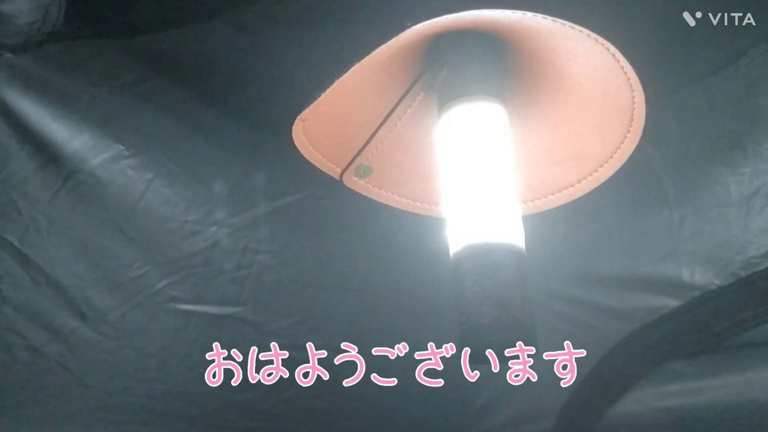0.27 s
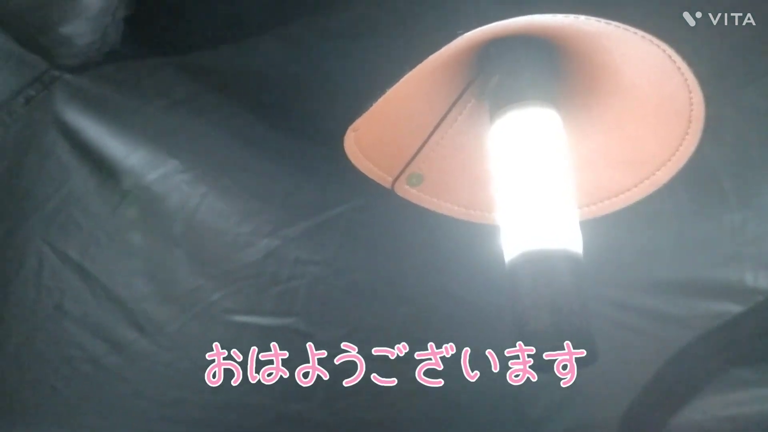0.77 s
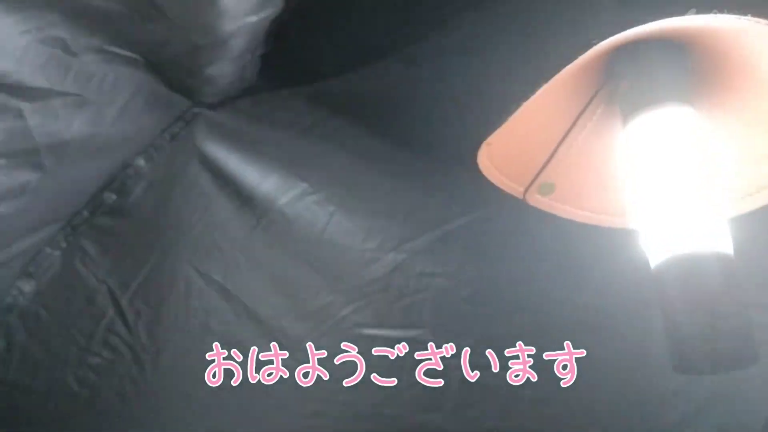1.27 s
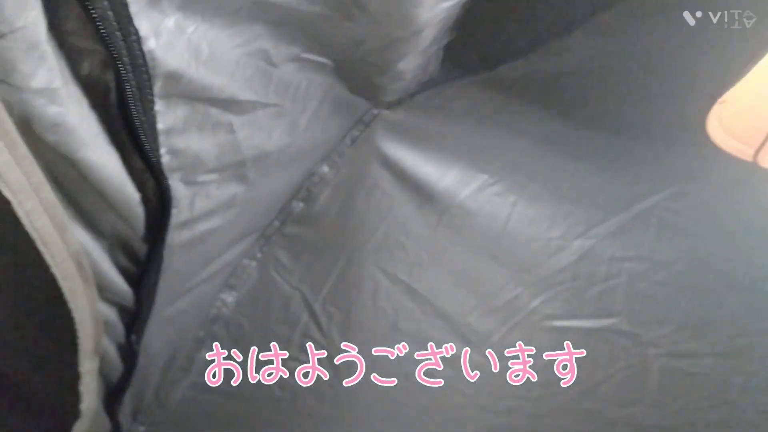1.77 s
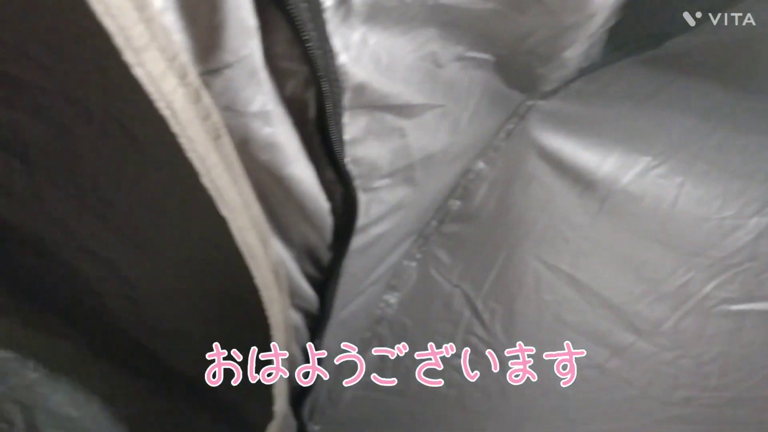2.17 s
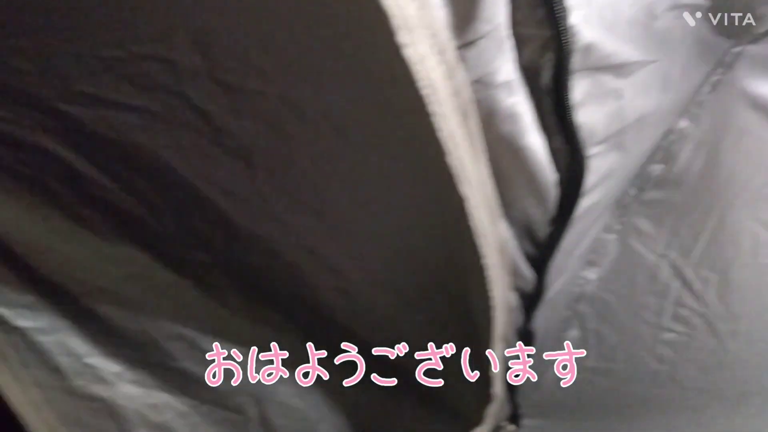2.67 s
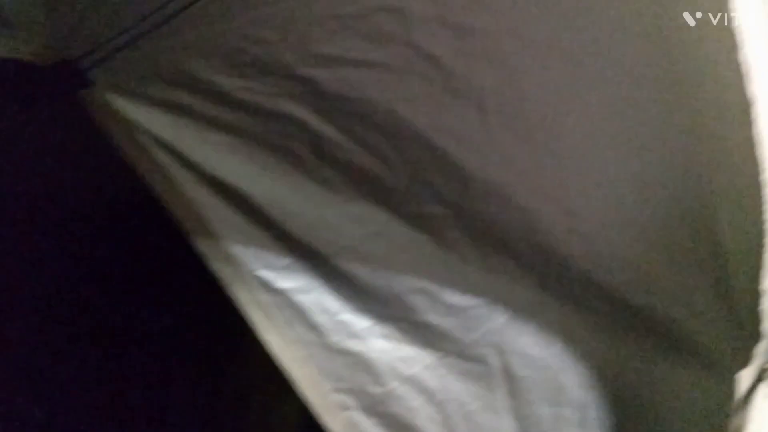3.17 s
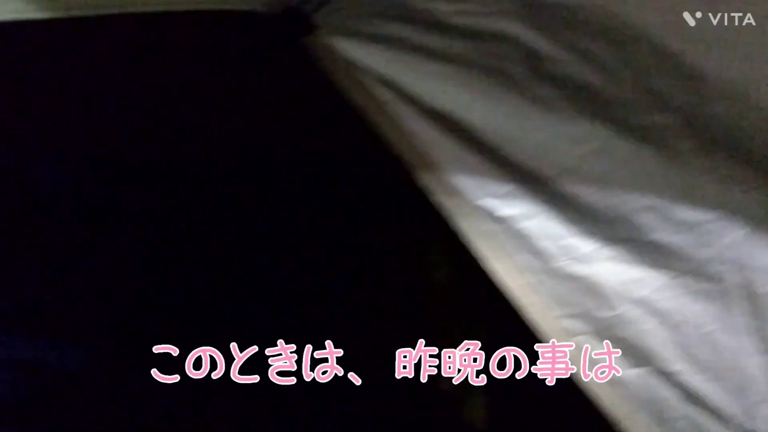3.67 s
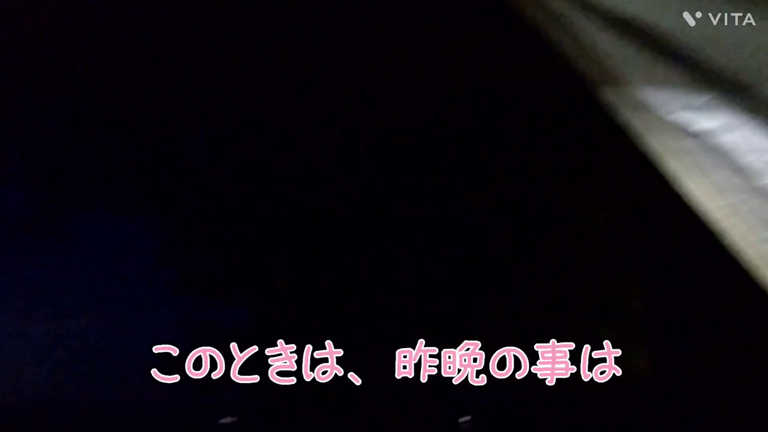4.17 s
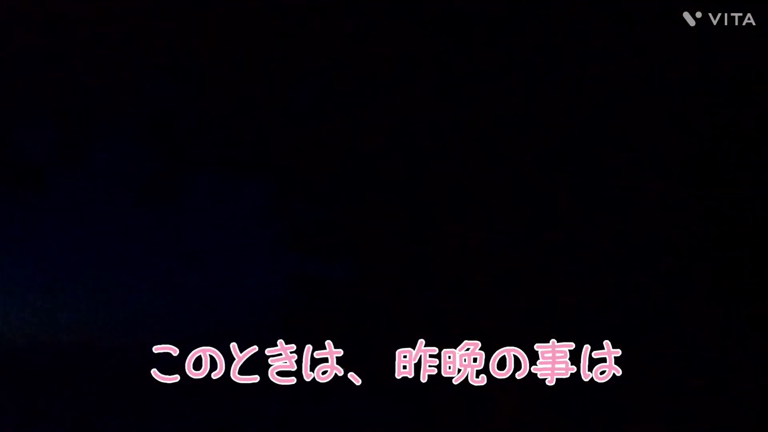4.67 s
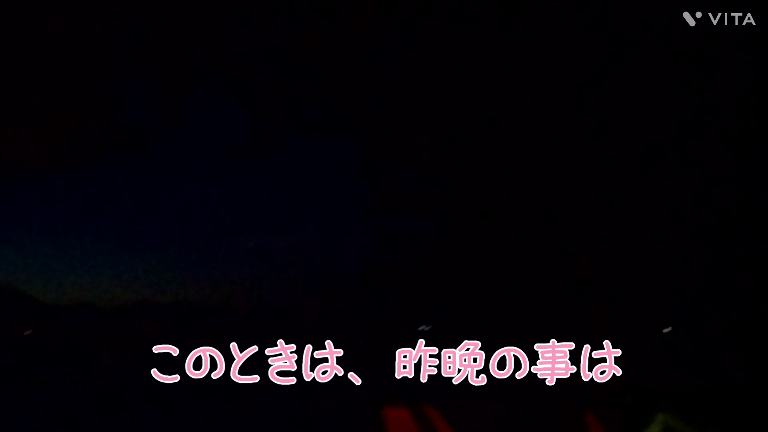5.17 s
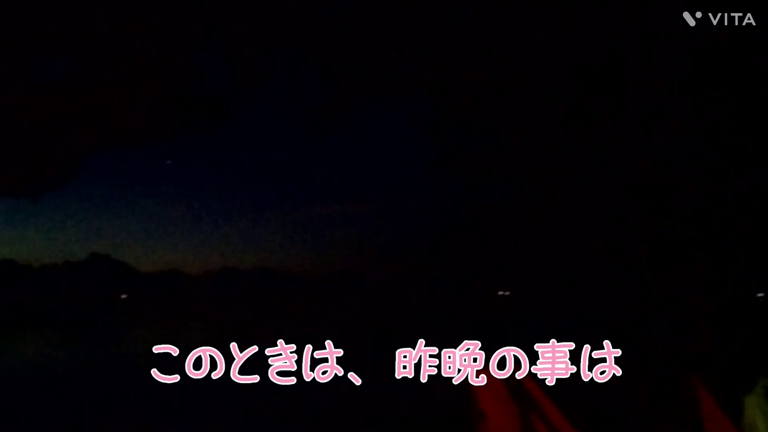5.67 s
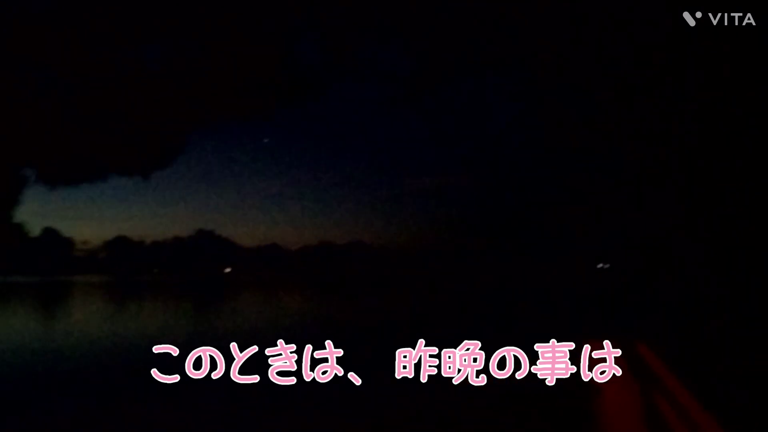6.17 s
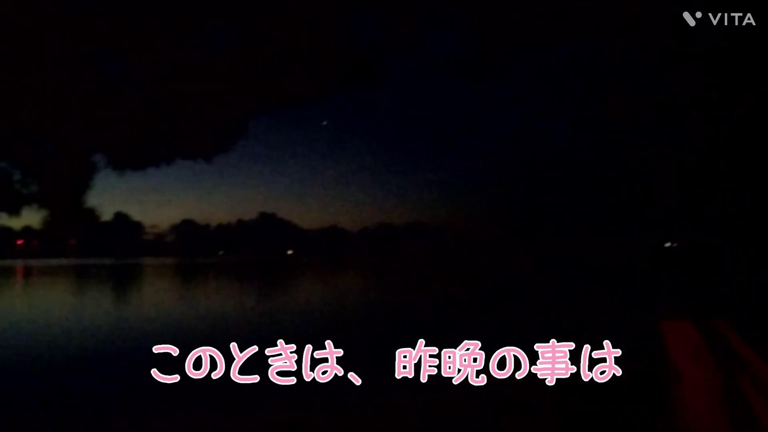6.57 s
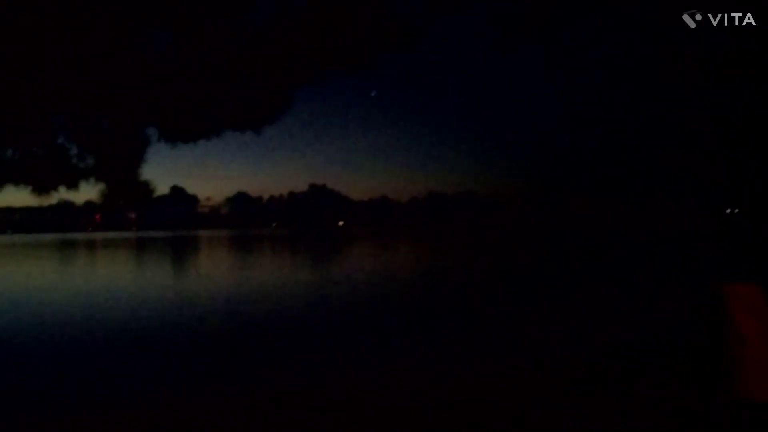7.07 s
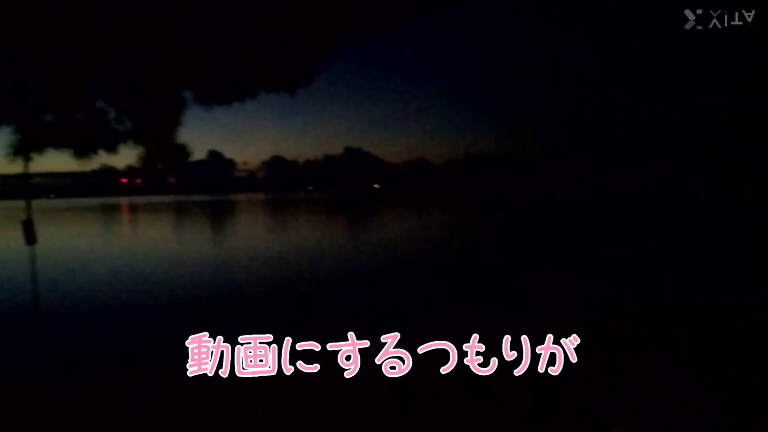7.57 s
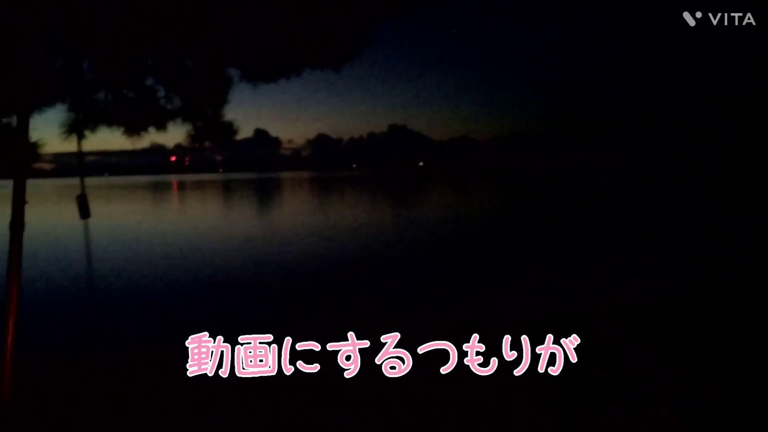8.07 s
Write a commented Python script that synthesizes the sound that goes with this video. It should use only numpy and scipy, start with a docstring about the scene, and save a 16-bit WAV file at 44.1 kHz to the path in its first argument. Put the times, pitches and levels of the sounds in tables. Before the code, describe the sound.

Crickets trill beside a still lake, the near ones in quick runs of high chirps and the distant ones blurring into a shimmering note. They are loudest at first, then carry on more softly. A low distant rumble, faint wind and water and microphone hiss lie underneath. Tent cloth rustles lightly near the start, a hand softly bumps the microphone a few times midway, and faint cloth ticks follow.

```python
"""Field crickets trill by a lake before dawn, heard while a camera is carried out of a tent.
A cricket scrapes one wing along the other: each stroke is a short whistle sliding down near 4 kHz.
Farther crickets blur into one note with a thin overtone, and one small cricket peeps high above.
Under them lie a distant rumble, a murmur of wind and water, faint drones and microphone hiss.
The tent cloth rustles and ticks, and a hand softly bumps the camera."""
import sys
import numpy as np
from scipy import signal
from scipy.fft import rfft, irfft
from scipy.io import wavfile
from scipy.ndimage import uniform_filter1d

SR = 44100
rng = np.random.default_rng(int(sys.argv[2]) if len(sys.argv) > 2 else 0)


def to_wav(s):
    """Save 16-bit WAV."""
    ch = np.atleast_2d(s).T  # columns
    pcm = np.round(np.clip(ch, -1, 1) * 32767)  # PCM
    wavfile.write(sys.argv[1], SR, pcm.astype(np.int16))


N = 366912
TIME = np.arange(N) / SR

# the microphone is more sensitive at first: (time [s], gain [dB])
MIC_SENSITIVITY = [(0, 4.5), (.4, 3.5), (.8, 3.5), (.86, 0), (8.32, 0.5)]


def gain_of(db):
    """Turns decibels into a number to multiply a sound by."""
    return 10 ** (np.asarray(db) / 20)


def evened(x):
    """The same sound with its average strength (rms) set to 1."""
    return x / np.sqrt(np.mean(x ** 2) + 1e-20)


def level(curve):
    """Turns a curve of (time [s], level [dB]) into a gain for every sample."""
    return gain_of(np.interp(TIME, *np.transpose(curve)))


def swells(rows):
    """A gain that rises and falls smoothly for each (time [s], level [dB], length [s])."""
    return sum(gain_of(db) * np.exp(-(2 * (TIME - s) / length) ** 2) for s, db, length in rows)


def coloured(x, points):
    """Shapes a sound's lows and highs by a curve of (frequency [Hz], relative level [dB])."""
    hz, db = np.transpose(points)
    bins = np.fft.rfftfreq(len(x), 1 / SR)
    gain = gain_of(np.interp(np.log(bins + 1), np.log(hz + 1), db))
    return evened(irfft(rfft(x) * gain, len(x)))


def band(count, hz, width_hz):
    """Noise around one pitch; around 0 Hz it is a slow random wander."""
    bins = np.fft.rfftfreq(count, 1 / SR)
    bell = np.exp(-.5 * ((bins - hz) / width_hz) ** 2)
    return evened(irfft(rfft(rng.standard_normal(count)) * bell, count))


def patchy_noise(depth_db):
    """Noise in which small patches of time and pitch grow louder and softer on their own."""
    spectrum = signal.stft(rng.standard_normal(N), nperseg=512, noverlap=384)[2]
    patches = uniform_filter1d(rng.standard_normal(spectrum.shape), size=5, axis=0)  # smooth over pitch
    patches = evened(uniform_filter1d(patches, size=8, axis=1))  # and over time
    noise = signal.istft(spectrum * gain_of(depth_db * patches), nperseg=512, noverlap=384)[1]
    return evened(noise[:N])


def add(mix, s, sound):
    """Mixes a sound in, starting at s seconds."""
    start = round(s * SR)
    sound = sound[max(-start, 0):]
    part = mix[max(start, 0):][:len(sound)]
    part += sound[:len(part)]


def distant_rumble(db=-59.5):
    """The still air over the lake carries a deep, far-off rumble."""
    # the rumble's tone: (frequency [Hz], relative level [dB])
    tone = [(12, -42.5), (20, 4), (27, -6.5), (43, -3), (65, -8), (92, -8), (144, -13), (376, -24),
            (505, -28.5), (549, -31), (818, -30), (1070, -33), (1500, -33.5), (3000, -39.5), (3900, -39.5),
            (6600, -120)]
    return gain_of(db) * level(MIC_SENSITIVITY) * coloured(rng.standard_normal(N), tone)


def wind_and_water(gain_db=-2):
    """Wind and water blend into a soft, uneven murmur."""
    # how the murmur rises and falls: (time [s], level [dB])
    loudness = [(0.03, -67.5), (0.44, -66.5), (0.91, -72.5), (1.55, -75.5), (2.22, -68.5), (3.15, -71.5),
                (4.07, -67.5), (5.78, -72), (6.06, -70), (8.32, -72)]
    # its tone: (frequency [Hz], relative level [dB])
    tone = [(150, 1.5), (330, -20.5), (500, 3), (800, -1.5), (1400, -5), (2300, -5), (3200, -11.5),
            (6000, -21)]
    return gain_of(gain_db) * level(loudness) * coloured(patchy_noise(depth_db=4), tone)


def hiss(floor_db=-75, gain_db=4):
    """The microphone hisses all the time, and the hiss swells when cloth brushes past."""
    # the hiss's tone: (frequency [Hz], relative level [dB])
    tone = [(1000, -11.5), (2800, -3.5), (4300, 2.5), (5000, 4), (5700, 0.5), (6800, 4), (7900, 3),
            (8800, 0), (10500, 0), (12500, 2.5), (14300, 0)]
    # brushes of cloth: (time [s], level [dB], length [s])
    brushes = [(.4, -77.5, 0.56), (4.3, -82, 1), (6.4, -83.5, 0.63), (7.65, -74, 0.57), (8.3, -78, .4)]
    loudness = np.hypot(gain_of(floor_db) * level(MIC_SENSITIVITY), swells(brushes))
    return gain_of(gain_db) * loudness * coloured(patchy_noise(depth_db=2.5), tone)


def far_drones():
    """Faint hums come and go from far over the water."""
    # the hums: (time [s], level [dB], pitch [Hz], length [s])
    drones = [(2.31, -77.5, 450, 1.3), (4.2, -82.5, 803, 1.6), (5.056, -75, 476, 0.46)]
    return sum(band(N, hz, width_hz=75) * swells([(s, db, length)]) for s, db, hz, length in drones)


def tent_rustles(spread=0.13, grain_db=1.5):
    """Cloth slips in short, rough squeaks, some rising in pitch as it tightens."""
    # the squeaks: (time [s], level [dB], pitch [Hz], length [s], rise [octaves/s])
    rustles = [(.335, -69, 1750, 0.028, -1), (0.386, -65.5, 557, 0.055, 6), (0.435, -64, 1123, 0.025, 1),
               (0.454, -64, 1710, 0.02, -2), (0.502, -64.5, 1220, 0.038, 11.5), (.548, -63.5, 535, .058, 0),
               (0.559, -67, 1600, 0.045, -2.5), (1.55, -71.5, 890, 0.051, 0.5),
               (2.524, -70, 1980, 0.023, -1), (4.209, -66.5, 858, .054, -.5), (6.267, -69, 980, .04, 16),
               (6.963, -66.5, 1310, .023, 5), (7.12, -68.5, 1112, 0.046, 15.5)]
    out, count = np.zeros(N), SR // 5
    t = TIME[:count] - TIME[count - 1] / 2  # zero at the squeak's middle
    for s, db, hz, length, rise in rustles:
        phase = 2 * np.pi * np.cumsum(hz * 2 ** (rise * t)) / SR
        squeak = band(count, 0, spread * hz) * np.cos(phase)
        squeak += band(count, 0, spread * hz) * np.sin(phase)
        squeak = evened(squeak * gain_of(grain_db * band(count, 0, 250)))  # it sticks and slips
        add(out, s + t[0], gain_of(db) * squeak * np.exp(-(2 * t / length) ** 2))
    return out


def tent_ticks(fade_s=0.046):
    """The tent's creases and fittings tick: bursts of noise that drop 60 dB in fade_s."""
    # the ticks: (time [s], level [dB], pitch [Hz], band width [Hz])
    ticks = [(.498, -60, 1600, 600), (.612, -63, 7500, 4000), (3.565, -64.5, 7000, 2000),
             (5.884, -61.5, 1810, 350), (6.263, -65, 2500, 500), (6.389, -65, 1900, 450),
             (6.557, -61, 3200, 3000), (6.62, -64, 2400, 700), (6.695, -66, 2120, 200),
             (7.099, -58.5, 8000, 6000), (7.102, -64, 2400, 250)]
    out, t = np.zeros(N), TIME[:SR // 5]
    for s, db, hz, width_hz in ticks:
        add(out, s, gain_of(db - 60 * t / fade_s) * band(len(t), hz, width_hz))
    return out


def tent_crinkles(count=6, first_s=6.1, last_s=7.8, db=-68, hz=2100, scatter_hz=400, fade_s=0.058):
    """Fainter creases in the cloth snap at random moments."""
    out, t = np.zeros(N), TIME[:SR // 5]
    for earliness, brightness in rng.random((count, 2)):
        snap = band(len(t), hz + scatter_hz * (2 * brightness - 1), width_hz=400)
        add(out, last_s - earliness * (last_s - first_s), gain_of(db - 60 * t / fade_s) * snap)
    return out


def camera_bumps(rise_s=0.0016):
    """A hand bumps the camera, which rocks briefly with a low thud."""
    # the bumps: (time [s], level [dB], pitch [Hz], time to fade by 60 dB [s])
    bumps = [(0.096, -50, 56.6, 0.59), (3.813, -42, 159, 0.021), (4.638, -39.5, 153, 0.014),
             (4.933, -40.5, 127, 0.013), (4.993, -44, 152, 0.019)]
    out, t = np.zeros(N), TIME[:SR // 3]
    for s, db, hz, fade_s in bumps:
        loudness = 2 * (1 - np.exp(-t / rise_s)) * gain_of(db - 60 * t / fade_s)
        add(out, s, -loudness * np.sin(2 * np.pi * hz * t))
    return out


def tree_echoes(x, fade_s, echo_db):
    """Trunks and leaves scatter a distant sound and blur it."""
    t = TIME[:SR // 3]
    tail = rng.standard_normal(len(t)) * gain_of(-60 * t / fade_s)
    echoes = evened(signal.fftconvolve(x, tail)[:N])
    return evened(evened(x) + gain_of(echo_db) * echoes)


def shore_echoes(x, fade_s=1.0, bounce_db=-15, tail_db=-12):
    """Sound bounces quickly off the ground and tent, then grass and trees add a thin tail."""
    t = TIME[:SR // 2]
    tail = rng.standard_normal(len(t)) * gain_of(-60 * t / fade_s) * (t > .008)
    echo = gain_of(tail_db) * tail / np.linalg.norm(tail)
    for delay_s in (.0047, .0115):
        echo[round(delay_s * SR)] += gain_of(bounce_db)
    return x + signal.fftconvolve(x, echo)[:N]


def wing_stroke(s, db, hz, length, roughness=0.18, octave_db=-31, bite_s=0.0035):
    """One wing scrapes the other's teeth and slows, so the whistle falls; gives (start time, sound)."""
    # the falling pitch: (time from the stroke's middle [s], pitch shift [Hz])
    slide = [(-.03, 278), (-.016, 242.5), (0, 3), (.012, -220), (.034, -580)]
    # how strongly the wing rings at each pitch: (pitch [Hz], gain [dB])
    wing_ring = [(3250, -5), (3550, 2), (3900, -0.5), (4180, 2), (4300, -2.5), (4450, -23)]
    count = 3400
    t = (np.arange(count) - count / 2) / SR
    pitch = hz + np.interp(t, *np.transpose(slide))
    phase = 2 * np.pi * (np.cumsum(pitch) / SR + rng.random())
    whistle = np.sin(phase) + gain_of(octave_db) * np.sin(2 * phase)
    bite = .5 + .5 * np.tanh((t + 0.647 * length) / bite_s)  # the wing grips quickly
    swell = bite * np.exp(-abs(2.15 * t / length) ** 1.66) * signal.windows.tukey(count, .2)
    swell *= 1 + roughness * band(count, 0, 220)  # the teeth catch unevenly
    gain = gain_of(db + np.interp(pitch, *np.transpose(wing_ring)))
    return s + t[0], gain * swell * whistle


def trill(pitch_curve, spread_db, scatter_hz, strokes_per_s=20):
    """A distant cricket strokes on and on, a little unevenly, near a curve of (time [s], pitch [Hz])."""
    out = np.zeros(N)
    gap, loud, detune = rng.standard_normal((220, 3)).T
    times = np.cumsum((1 + .15 * gap) / strokes_per_s) - rng.random() / 2
    pitches = np.interp(times, *np.transpose(pitch_curve)) + scatter_hz * detune
    for s, db, hz in zip(times, spread_db * loud, pitches):
        add(out, *wing_stroke(s, db, hz, length=0.039))
    return out


def peeping_cricket(hz=6490, first_s=0.074, period_s=.383):
    """One small cricket gives faint, high peeps at a steady pace."""
    peeps = np.cos(np.pi * (TIME - first_s) / period_s) ** 64
    peeps *= gain_of(2 * band(N, 0, 1))  # some are louder than others
    pitch = hz + 70 * band(N, 0, 100)
    whistle = np.sin(2 * np.pi * np.cumsum(pitch) / SR)
    loudness = level([(0, -87), (4.5, -89), (6, -85.5), (8.32, -87)])
    return loudness * evened(peeps * whistle)


def far_cricket_overtones(count=4, hz=7700, gain_db=-5):
    """The far crickets' strokes carry a thin, fluttering overtone an octave up, made as its own trills."""
    # when the overtone swells: (time [s], level [dB], length [s])
    bouts = [(.2, -79, 0.82), (2.25, -74, 1.3), (3.8, -75, 1.9), (5.5, -75.5, 0.78), (7.6, -76, 0.87)]
    flutter = sum(trill([(0, hz)], spread_db=4.5, scatter_hz=328) for _ in range(count))
    return gain_of(gain_db) * swells(bouts) * tree_echoes(flutter, fade_s=0.029, echo_db=7)


def far_crickets(count=5, gain_db=-2.5):
    """Distant crickets, out of step with each other, blur into one shimmering note."""
    # how loud they are together: (time [s], level [dB])
    loudness = [(0.03, -59.5), (0.65, -67), (0.86, -81), (1.62, -71), (2.38, -61), (3.1, -67), (4.0, -62.5),
                (5.22, -69.5), (5.55, -69), (6.47, -68), (7.05, -72), (7.3, -71.5), (8.0, -73),
                (8.32, -65.5)]
    # their pitch, as a higher group comes into earshot: (time [s], pitch [Hz])
    pitch_curve = [(0, 3838), (6.7, 3819), (7.1, 3990), (8.32, 3900)]
    chorus = sum(trill(pitch_curve, spread_db=3.5, scatter_hz=55) for _ in range(count))
    return gain_of(gain_db) * level(loudness) * tree_echoes(chorus, fade_s=0.096, echo_db=-4)


def near_crickets(slow_spacing_s=0.081, slow_length_s=0.034, uneven_db=0.5, uneven_hz=16.2, gain_db=-0.5):
    """Nearby crickets sing in runs and pairs of wing strokes; a quicker pace makes shorter strokes."""
    # evenly paced runs: (first stroke [s], last stroke [s], strokes [count],
    # first level [dB], last level [dB], pitch [Hz])
    runs = [(.002, .360, 6, -46, -46, 3900), (.434, .809, 9, -48, -49.5, 3913),
            (0.89, .939, 2, -52.5, -50.5, 3915), (1.02, 1.113, 3, -52.5, -52.5, 3924),
            (1.08, 1.562, 8, -56, -59.5, 4140), (1.193, 1.242, 2, -56, -56, 3920),
            (1.326, 1.372, 2, -57.5, -57, 3890), (1.466, 1.510, 2, -58.5, -59, 3920),
            (1.607, 1.645, 2, -62.5, -60, 3900), (1.711, 1.746, 2, -55.5, -63, 3910),
            (1.794, 2.226, 7, -52.5, -54, 3905), (2.283, 2.426, 3, -54, -55, 3870),
            (2.330, 2.475, 4, -62, -54.5, 3926), (2.558, 2.88, 8, -57.5, -63.5, 3886),
            (3.116, 3.455, 8, -61, -62.5, 3840), (3.564, 3.850, 5, -59, -56.5, 3896),
            (3.928, 4.227, 5, -52.5, -55.5, 3930), (4.314, 4.511, 3, -62, -70, 3830),
            (4.569, 4.614, 2, -57.5, -61, 3790), (4.695, 4.922, 6, -59, -62.5, 3845),
            (5.007, 5.050, 2, -64, -62, 3750), (5.142, 5.173, 2, -63, -66, 3750),
            (5.25, 5.387, 3, -60.5, -65, 3840), (5.441, 5.638, 5, -60, -55.5, 3890),
            (5.719, 6.083, 6, -53.5, -52, 3883), (6.162, 6.543, 9, -54, -56.5, 3900),
            (6.635, 6.681, 2, -56.5, -57, 3880), (6.780, 6.826, 2, -59.5, -60, 3830),
            (7.008, 7.605, 10, -68, -70.5, 4160), (8.097, 8.314, 4, -58, -58, 3990)]
    out = np.zeros(N)
    for first, last, strokes, first_db, last_db, hz in runs:
        times, spacing = np.linspace(first, last, round(strokes), retstep=True)
        length = slow_length_s * min(spacing / slow_spacing_s, 1) ** 0.6
        for s, db in zip(times, np.linspace(first_db, last_db, len(times))):
            softer, detune = rng.standard_normal(2)
            add(out, *wing_stroke(s, db - uneven_db * softer, hz + uneven_hz * detune, length))
    return gain_of(gain_db) * shore_echoes(out)


def scene():
    """Crickets, night air, tent and bumps, all heard at one microphone."""
    crickets = near_crickets() + far_crickets() + peeping_cricket() + far_cricket_overtones()
    background = distant_rumble() + wind_and_water() + hiss() + far_drones()
    tent = tent_rustles() + tent_ticks() + tent_crinkles()
    return (crickets + background + tent + camera_bumps())[None]


def record(dry, offset=0.048, settle_s=0.54, cutoff_hz=14380):
    """Just switched on, the microphone drifts back to zero, too slowly to hear; the top treble is cut."""
    drift = -offset * np.exp(-(TIME / settle_s) ** 1.11)
    treble_cut = signal.firwin(511, cutoff_hz, window=("kaiser", 9), fs=SR)
    return signal.oaconvolve(dry + drift, treble_cut[None], "same")


dry = scene()
out = record(dry)
to_wav(out)
```